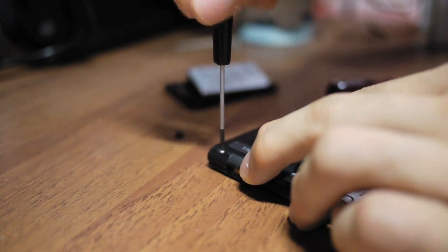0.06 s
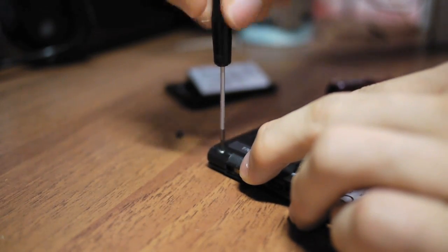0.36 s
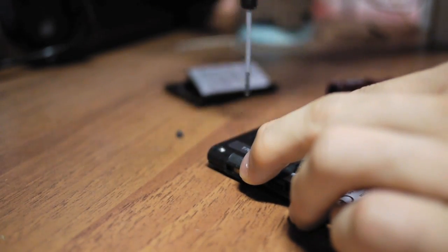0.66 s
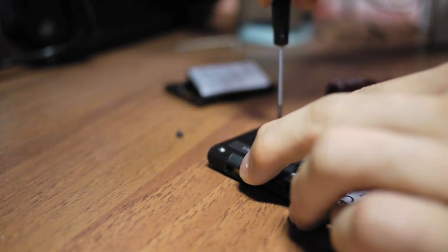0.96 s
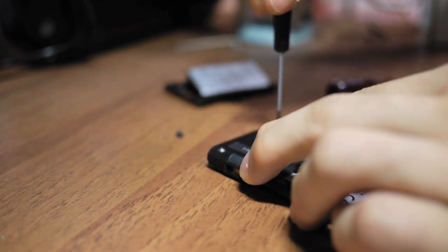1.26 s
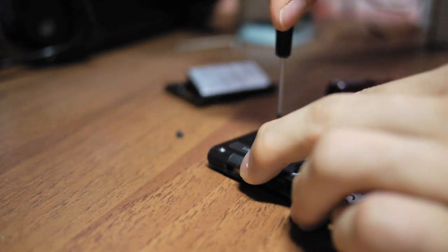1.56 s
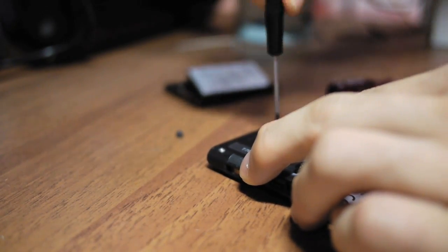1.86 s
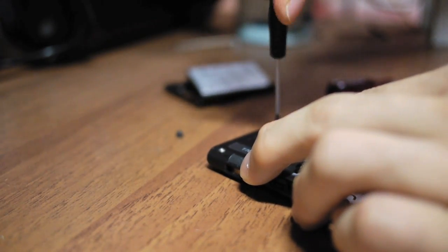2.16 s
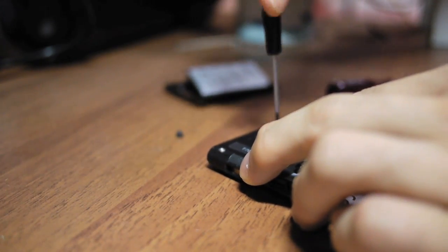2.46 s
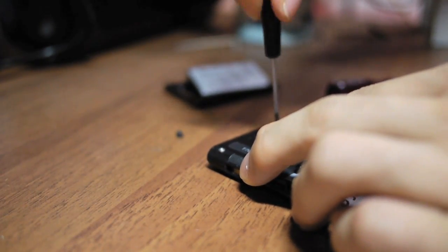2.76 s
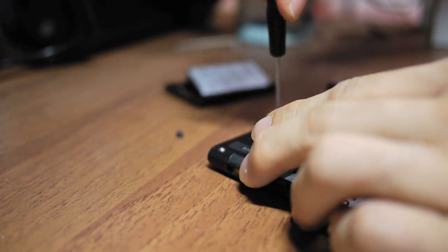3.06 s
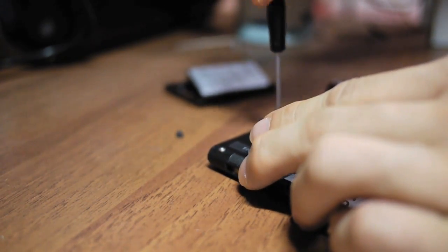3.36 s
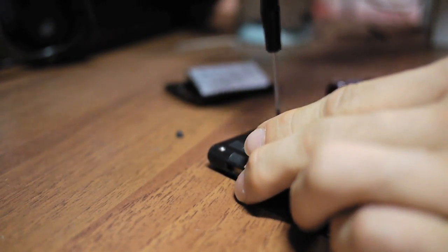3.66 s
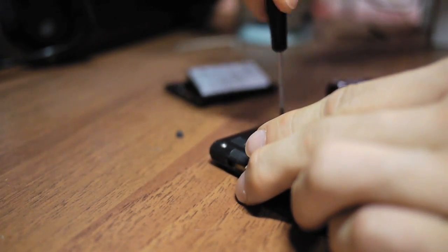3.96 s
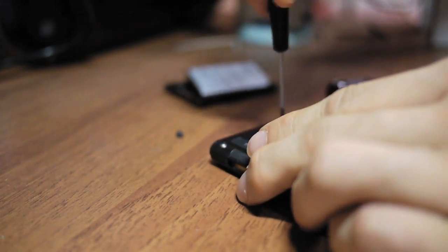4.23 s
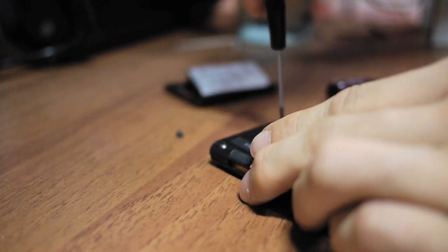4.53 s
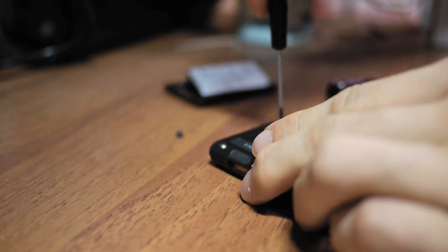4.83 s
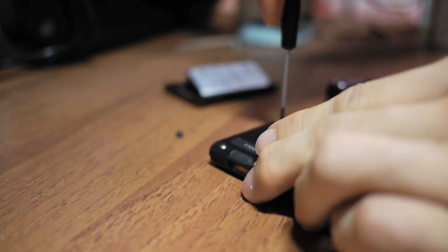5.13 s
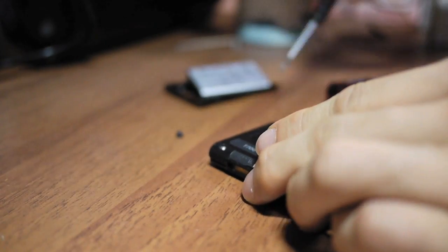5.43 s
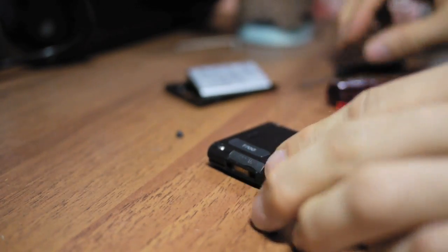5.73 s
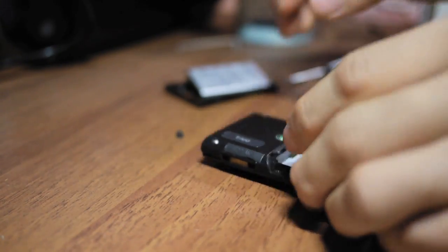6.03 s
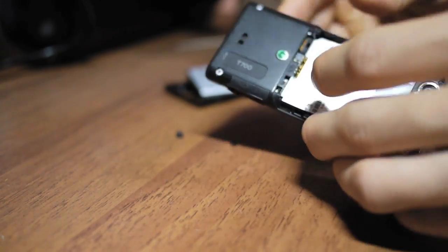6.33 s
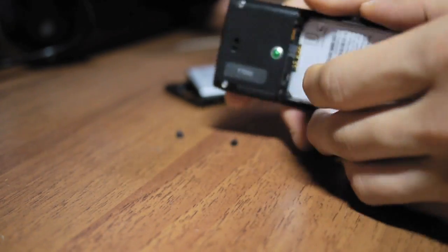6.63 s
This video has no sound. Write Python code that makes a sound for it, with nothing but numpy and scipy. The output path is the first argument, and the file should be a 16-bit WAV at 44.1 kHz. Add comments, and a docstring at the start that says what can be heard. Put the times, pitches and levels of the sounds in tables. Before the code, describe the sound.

In a quiet room with a low, steady rush, a small screwdriver slips from a phone's tiny screw right at the start, making three sharp clicks close to a stereo microphone. Until about 2.4 seconds there are light tip touches, soft knocks of the phone on a wooden desk and gentle rubbing of hands. A faint, even ticking appears briefly near 0.4 seconds and again from 1.9 to 3.5. From 2.5 to 4 seconds a second screw grinds loose in six short twists, with bright clicks as the bit slips and reseats. Farther off, a metal piece clinks and clatters sharply around 4.3 to 4.5 seconds, with a little room echo. A chair creaks softly from 5 to 5.6 seconds. At 5.8 the phone is picked up close by, its plastic case snapping rapidly, then crackling under the fingers until about 6.9, with hand rustle and a few more creaks.

```python
"""A screwdriver bit slips from a tiny screw with sharp clicks, and the phone under it knocks on a wooden desk,
close to a stereo microphone in a quiet room. Hands rub, a faint, even ticking comes and goes, and a second
screw grinds loose in six twists. Farther off, a metal piece clinks and clatters and a chair joint creaks.
Close again, the plastic case snaps and crackles as the phone is picked up. Clicks, knocks and creaks are
pulses of force ringing damped resonances; the moving hands and the room tone are coloured noise."""
import sys
import numpy as np
from scipy import signal
from scipy.fft import rfft, irfft, next_fast_len
from scipy.io import wavfile
from scipy.ndimage import uniform_filter1d

SR = 44100
rng = np.random.default_rng(int(sys.argv[2]) if len(sys.argv) > 2 else 0)


def pcm_store(signal):
    """Save signal as 16-bit PCM."""
    levels = np.round(np.clip(np.atleast_2d(signal), -1, 1) * 32767)
    wavfile.write(sys.argv[1], SR, levels.astype(np.int16).T)


N = 303849

# Levels in the tables are relative: a source may add a gain of its own.
# spectra of the room tone, of skin and sleeve, and of hands on the desk: (frequency [Hz], level [dB])
AIR_COLOUR = [(12, -35.5), (20, 3.5), (65, 1), (319, -11), (422, -16), (590, -10.5), (698, -18.5),
              (802, -15.5), (923, -20), (3630, -35.5), (7110, -35.5), (8410, -40.5), (12400, -39.5),
              (14700, -41), (16000, -42)]
RUB_COLOUR = [(530, -30), (900, -2), (1170, -7.5), (1490, -2), (1990, -11.5), (2860, -4.5), (3960, -10),
              (5680, -3), (10600, -9.5), (13500, -11), (16000, -12.5)]
RUMBLE_COLOUR = [(24, -31), (40, 9.5), (86, -5.5), (118, 0), (210, -13), (322, -9.5), (422, -13.5),
                 (554, -9.5), (671, -17), (1030, -21.5), (1800, -32), (2340, -49.5), (3960, -120)]
# moves of the hands: (start [s], end [s], hiss [dB], rumble [dB])
HAND_MOVES = [(-0.1, 0.153, -57, -45.5), (0.85, 0.903, -69, -56), (1.198, 1.33, -64, -43),
              (1.655, 1.785, -67, -43.5), (2.19, 2.203, -57, -45), (2.473, 3.72, -62.5, -47.5),
              (4.505, 4.627, -59, -49), (5, 5.265, -63, -49), (5.547, 5.74, -59, -75),
              (6.175, 6.59, -54, -42), (6.617, 6.7, -49, -37.5)]
# the bit slips in the corner screw: (time [s], level [dB], tilt [dB/octave], contact [ms], knock [dB])
CORNER_SLIPS = [(0.0599, -7.5, -1.5, 2.4, -33.5), (0.134, -20, 1.2, 13, -39),
                (0.1667, -13.5, 1.5, 9.9, -28)]
# the bit fidgets in the screw head: (time [s], level [dB])
FIDGET_LEVEL = [(0.3, -72), (2.0, -74), (2.35, -64), (3.9, -61), (4.1, -71.5), (5.3, -75), (5.5, -88)]
# runs of faint ticking: (start [s], end [s])
TICK_RUNS = [(0.346, 0.47), (1.892, 2.02), (2.043, 3.52)]
# light touches of the driver's tip: (time [s], level [dB])
TIP_TOUCHES = [(0.364, -45), (0.5694, -51), (1.0505, -45), (1.0717, -48.5), (1.2882, -48), (1.4414, -51),
               (2.3685, -45), (3.767, -43), (4.0026, -44.5), (4.0751, -46.5), (4.938, -34), (4.9901, -35.5),
               (5.286, -50), (5.7497, -44)]
# the phone rocks on the desk: (time [s], level [dB], tilt [dB/octave])
DESK_KNOCKS = [(0.434, -37, -0.5), (0.569, -34, -7), (0.599, -32.5, -11.5), (0.725, -33, -9),
               (1.072, -30.5, -1), (1.298, -34.5, -5), (1.656, -35.5, -3.5), (1.923, -31.5, -3.5),
               (2.045, -33, -2), (6.073, -24, -2), (6.099, -33, -20)]
# the bit is seated or regripped: (time [s], level [dB], tilt [dB/octave], knock [dB])
REGRIPS = [(0.779, -42, 0.8, -42.5), (1.1249, -32.5, -1.5, -43), (1.2653, -38.5, 9, -37.5),
           (1.522, -43, -7.5, -42.5), (1.6981, -33.5, 2, -39), (2.4188, -31.5, -0.5, -37),
           (2.453, -31, 4, -50), (2.6731, -30.5, 4.5, -37.5), (2.95, -29, 4, -46.5),
           (3.1568, -30.5, 8, -73), (3.4384, -27, 5.5, -45), (3.5498, -15, 7.5, -39.5),
           (3.8124, -30, 5.5, -64)]
# twists of the second screw: (time [s], slip level [dB], delay until the bit reseats [s], force [dB])
TWISTS = [(2.501, -12, 0.028, -0.5), (2.7661, -13.5, 0.03, -4.5), (3.0613, -11, 0.042, -3.5),
          (3.3306, -27, 0.05, -1), (3.6426, -21.5, 0.054, -2), (3.8981, -26.5, 0.028, -15.5)]
# the metal piece hits a hard surface: (time [s], level [dB], tilt [dB/octave], contact [ms])
CLATTER_HITS = [(4.2555, -23.5, 2, 24), (4.365, -14.5, -2.5, 4.4), (4.368, -5.5, 0.5, 5.5),
                (4.4125, -12.5, 0, 9), (4.418, -16, -0.5, 11), (4.448, -20.5, -1.5, 9)]
# the piece itself rings: (time [s], level [dB])
CLINKS = [(4.2563, -14), (4.266, -25), (4.368, -17.5), (4.404, -15.5), (4.4145, -13), (4.427, -14)]
# creaks of the chair: (time [s], length [s], level [dB])
CREAKS = [(4.99, 0.011, -32), (4.995, .25, -44), (5.039, 0.014, -36), (5.159, 0.0263, -38.5),
          (5.233, .022, -40), (5.3767, 0.013, -26), (5.425, 0.013, -29.5), (5.5, 0.02005, -27.5),
          (5.572, 0.0068, -31.5), (6.63, .022, -27.5), (6.692, 0.018, -37.5), (6.791, .005, -39.5),
          (6.821, 0.0045, -41.5)]
# snaps of the plastic case: (time [s], level [dB], tilt [dB/octave], contact [ms])
CASE_SNAPS = [(5.8034, -10, 0.5, 41), (5.846, -18.5, 5, 9.5), (5.917, -14, 3, 66), (5.9248, -20, -3, 20),
              (5.9355, -15.5, 11, 24), (5.9636, -18, 4, 12), (5.9963, -17, 2.5, 24),
              (6.023, -23.5, -1.5, 58), (6.0674, -22.5, -0.5, 57), (6.0737, -24, -13, 44),
              (6.118, -23, 0.5, 30), (6.1549, -24.5, -2, 24), (6.1877, -26, 1, 31)]
# crackle of the grip on the case: (time [s], level [dB])
CRACKLE_LEVEL = [(5.8, -80), (5.92, -53), (6.04, -52), (6.1, -46), (6.27, -46), (6.44, -51), (6.56, -52),
                 (6.71, -45.5), (6.89, -56.5)]

# resonances of each body: (frequency [Hz], bandwidth [Hz], level [dB])
CORNER_MODES = [(1296, 94, -15), (2234, 167, -1), (2550, 310, 1.5), (2740, 500, 1), (3395, 220, 0),
                (4600, 310, -1.5), (5800, 370, -2), (7000, 270, -4.5), (7970, 420, -5), (9250, 3100, -9.5),
                (11600, 1100, -9.5), (15500, 1400, -14)]  # phone, at the corner screw
CORNER_DESK_MODES = [(112, 29, 5), (178, 14, 0), (240.6, 53, -2), (324, 19, 4), (390, 20, -11.5),
                     (583, 72.4, -20.5)]  # desk, under that corner
SIDE_MODES = [(1270, 170, -6), (1794, 197, 4), (2277, 310, 3), (3390, 360, -0.5), (4360, 750, -2),
              (5130, 520, 1), (5800, 700, 0.5), (6900, 320, 4.5), (8750, 1800, -4.5), (10800, 2660, -4.5),
              (12460, 580, -1), (14400, 1200, -4)]  # phone, at the second screw
TICK_MODES = [(5080, 230, 6.5), (6200, 460, -3.5), (10500, 1900, -9), (12100, 900, -13), (12900, 730, -7)]  # small ticking part
DRIVER_MODES = [(1300, 600, -9), (2900, 1300, -5), (4700, 900, -4.5), (5800, 900, 0), (6800, 770, -2.5),
                (10300, 1800, -5), (12800, 2000, -7.5)]  # screwdriver tip
DESK_MODES = [(73.6, 51, -2), (125.7, 61, 1.5), (183.8, 8.3, -2.5), (221.3, 15, -5), (319.7, 14, 0.5),
              (384.5, 12, -3.5), (554, 42, -1.5), (807, 25.6, -13), (1068, 66, -15.5)]  # wooden desk
CLATTER_MODES = [(127, 24, 0.5), (195, 29, -0.5), (357, 62, 4.5), (750, 180, 5), (1213, 190, 3),
                 (1530, 260, 6), (2140, 840, 0), (2940, 220, 5), (3670, 870, 0.5), (4640, 540, 1.5),
                 (5730, 1200, 0.5), (6630, 540, 3.5), (8200, 2700, -5), (10400, 6500, -2.5),
                 (13760, 990, -8), (15330, 1190, -16)]  # hard surface under the metal piece
METAL_MODES = [(4624, 45, -10), (6780, 45, -3), (9980, 90, -3), (10140, 90, 1), (10250, 110, -2),
               (13690, 80, -4)]  # metal piece
CHAIR_MODES = [(338, 60, 0.5), (576, 48, 5), (806, 59, 8), (1037, 66, 5), (1219, 70, 4.5), (1460, 170, 3),
               (1824, 140, -1.5), (2320, 230, -8), (2620, 140, -6), (3100, 1200, -10)]  # chair frame
CASE_MODES = [(605, 820, -10), (1380, 420, -4.5), (1750, 390, -4), (2800, 730, 1.5), (4020, 1870, -2.5),
              (6580, 1820, 2.5), (8350, 1700, 2), (10580, 710, 2), (12400, 2480, -.5), (14900, 1500, -3.5)]  # plastic case

# likeness of diffuse sound at the two microphones: (frequency [Hz], correlation [-1..1])
MIC_LIKENESS = [(30, 0.77), (65, .1), (130, 0.78), (300, 0.9), (1000, 0.82), (2500, 0.15), (6000, 0.02),
                (16000, 0.055)]
# decay of the room: (frequency [Hz], time to fall 60 dB [s])
ROOM_T60 = [(100, 1), (500, 0.6), (2000, 0.63), (6000, 0.6), (15000, 0.29)]


def from_db(db):
    return 10 ** (np.asarray(db) / 20)


def rms_one(x):
    return x / np.sqrt(np.mean(x ** 2) + 1e-20)


def in_time(rows):
    return np.interp(np.arange(N) / SR, *np.transpose(rows))


def at_hz(points, hz):
    frequencies, values = np.transpose(points)
    return np.interp(np.log(hz), np.log(frequencies), values)


def add(track, s, sound):
    """Mix a stereo sound into a track at s seconds."""
    start = max(round(s * SR), 0)
    track[:, start:start + sound.shape[1]] += sound[:, :max(N - start, 0)]


def stereo_noise(colour, size):
    """Coloured noise of rms 1, mostly alike at both microphones in the bass, unrelated in the treble."""
    padded = next_fast_len(size)
    hz = np.maximum(np.fft.rfftfreq(padded, 1 / SR), 1)
    mid, side = rfft(rng.standard_normal((2, padded)))
    alike = at_hz(MIC_LIKENESS, hz)
    pair = np.sqrt(1 + alike) * mid + np.sqrt(1 - alike) * side * [[1], [-1]]
    return rms_one(irfft(pair * from_db(at_hz(colour, hz)), padded)[:, :size])


def ringing(modes, tilt_db, vary_db=3.5):
    """Damped modes, each reaching each microphone with its own random strength and tiny delay."""
    narrowest_hz = min(width for _, width, _ in modes)
    t = np.arange(int(3 * SR / narrowest_hz)) / SR
    out = 0
    for k, (hz, width, db) in enumerate(modes):
        age = np.maximum(t - rng.normal(3e-5, 2.2e-5, (2, 1)), 0)
        gain = width * from_db(db + tilt_db * np.log2(hz) + vary_db * rng.standard_normal((2, 1)))
        out = out + (-1) ** k * gain * np.exp(-np.pi * width * age) * np.sin(2 * np.pi * hz * age)
    return out


def blow(modes, db, tilt_db, contact_ms, grit):
    """An impact and a dying chatter, grit times as strong, ring a body; db sets the loudest 3 ms."""
    ms = np.arange(4096) * 1000 / SR
    fade = from_db(-60 * ms / contact_ms)
    chatter = rng.standard_normal(len(ms)) * fade
    force = grit * chatter / np.linalg.norm(chatter)
    force[0] += 1
    # contacts this brief hold all frequencies about equally
    for _ in range(4):
        flat_spectrum = np.exp(1j * np.angle(rfft(force)))
        force = irfft(flat_spectrum) * fade ** .1
    sound = signal.fftconvolve(ringing(modes, tilt_db), force[None], axes=1)
    loudest = uniform_filter1d(np.mean(sound ** 2, axis=0), size=132, mode="constant").max()
    return from_db(db) * sound / np.sqrt(loudest)


def blows(rows, modes, grit):
    """Blows on one body, each with its own brightness and contact time."""
    out = np.zeros((2, N))
    for s, db, tilt_db, contact_ms in rows:
        add(out, s, blow(modes, db, tilt_db, contact_ms, grit))
    return out


def taps(rows, modes, contact_ms, grit):
    """Blows with no tilt and one shared contact time."""
    return blows([(s, db, 0, contact_ms) for s, db in rows], modes, grit)


def bit_clicks(rows, modes, desk_modes, click_db, knock_db, grit, knock_ms):
    """The bit strikes the screw head: the phone rings and knocks on the desk. Rows as in CORNER_SLIPS."""
    clicks = blows([row[:-1] for row in rows], modes, grit)
    knocks = taps([(row[0], row[-1]) for row in rows], desk_modes, knock_ms, grit=0.99)
    return from_db(click_db) * clicks + from_db(knock_db) * knocks


def catches(modes, per_s, spread_db):
    """Tiny catches of uneven size ring a body at random times; rms 1."""
    sizes = from_db(spread_db * np.minimum(rng.exponential(1, N), 3))
    signs = rng.choice([-1, 1], N)
    clicks = sizes * signs * (rng.random(N) < per_s / SR)
    return rms_one(signal.oaconvolve(ringing(modes, 0), clicks[None], axes=1)[:, :N])


def room_tone():
    """The steady, low rush of a quiet room."""
    return stereo_noise(AIR_COLOUR, N)


def hands(attack_s=0.066, release_s=0.23):
    """Each move swells, holds and fades: skin and sleeve hiss, and the desk rumbles."""
    hiss, rumble = 0, 0
    for start, end, hiss_db, rumble_db in HAND_MOVES:
        motion = in_time([(start - attack_s, 0), (start, 1), (end, 1), (end + release_s, 0)])
        hiss = np.maximum(hiss, from_db(hiss_db) * motion)
        rumble = np.maximum(rumble, from_db(rumble_db - 4) * motion)
    return hiss * stereo_noise(RUB_COLOUR, N) + rumble * stereo_noise(RUMBLE_COLOUR, N)


def corner_screw():
    """The bit jumps out of the first screw head three times, jolting the phone against the desk."""
    return bit_clicks(CORNER_SLIPS, CORNER_MODES, CORNER_DESK_MODES,
                      click_db=-4, knock_db=2.5, grit=1, knock_ms=21)


def bit_fidget():
    """Sparse, tiny catches of the bit ring the phone."""
    return from_db(in_time(FIDGET_LEVEL)) * catches(SIDE_MODES, per_s=20, spread_db=2.5)


def even_ticking(gap_s=0.05215, spread_db=1.5):
    """One small tick repeats at nearly equal strength, like a lens drive stepping."""
    tick = blow(TICK_MODES, db=-49.5, tilt_db=0, contact_ms=28, grit=3.8)
    out = np.zeros((2, N))
    for start, end in TICK_RUNS:
        for s in np.arange(start, end, gap_s):
            add(out, s, from_db(spread_db * rng.standard_normal()) * tick)
    return out


def driver_tip():
    """Light touches ring the screwdriver's tip briefly."""
    return taps(TIP_TOUCHES, DRIVER_MODES, contact_ms=26, grit=1)


def phone_rocking(contact_ms=43):
    """The phone rocks and rings the low modes of the desk."""
    return blows([(*row, contact_ms) for row in DESK_KNOCKS], DESK_MODES, grit=0.98)


def second_screw(regrip_ms=23, slip_ms=26, reseat_ms=32):
    """The bit clicks as the fingers regrip; at each twist it slips out and drops back in."""
    rows = [(s, db, tilt_db, regrip_ms, knock_db) for s, db, tilt_db, knock_db in REGRIPS]
    for s, slip_db, delay_s, force_db in TWISTS:
        slip = (s, slip_db, 0.5, slip_ms, force_db - 30.5)
        reseat = (s + delay_s, force_db - 22, 1, reseat_ms, force_db - 35.5)
        rows += [slip, reseat]
    return bit_clicks(rows, SIDE_MODES, DESK_MODES, click_db=-6.5, knock_db=3, grit=2.1, knock_ms=20)


def thread_grind(full_force_db=-41.5, lead_s=0.019, length_s=0.11):
    """With each twist, dense grit in the thread swells and fades, ringing the case."""
    t = np.arange(N) / SR
    pressure = 0
    for s, _, _, force_db in TWISTS:
        progress = np.clip((t - s + lead_s) / length_s, 0, 1)
        pressure = pressure + from_db(full_force_db + force_db) * np.sin(np.pi * progress)
    return pressure * catches(CASE_MODES, per_s=2400, spread_db=7.5)


def metal_clatter():
    """The metal piece strikes a hard surface, ringing broad, short-lived modes."""
    return blows(CLATTER_HITS, CLATTER_MODES, grit=1.58)


def metal_clinks():
    """Brief contacts ring the piece's own high, narrow modes."""
    return taps(CLINKS, METAL_MODES, contact_ms=3.7, grit=1)


def chair_creaks(firm_db=-27, jitter=0.33, uneven_db=0.5, top_hz=3300):
    """A joint sticks and slips, ringing the frame; gentler creaks slip faster and are a little brighter."""
    out = np.zeros((2, N))
    for s, length_s, db in CREAKS:
        gentler_db = firm_db - db
        slips_per_s = 260 + 7 * gentler_db
        tilt_db = -2.3 + 0.08 * gentler_db
        gaps = np.exp(jitter * rng.standard_normal(160)) / slips_per_s
        times = np.cumsum(gaps) - gaps[0]
        sizes = from_db(uneven_db * rng.standard_normal(160))
        inside = times <= length_s
        pulses = np.bincount((times[inside] * SR).astype(int), sizes[inside])
        sound = signal.fftconvolve(ringing(CHAIR_MODES, tilt_db), pulses[None], axes=1)
        add(out, s, from_db(db) * sound * np.sqrt(2 * length_s * SR) / np.linalg.norm(sound))
    return signal.sosfilt(signal.butter(4, top_hz, fs=SR, output="sos"), out)


def case_snaps(slide_at_s=6.102, gap_s=0.017, jitter=0.27, count=14, fade_db_per_s=13):
    """The plastic case snaps as it is lifted, then slides through the fingers in a fading run of snaps."""
    ages = gap_s * (np.arange(count) + jitter * rng.standard_normal(count))
    tilt_db, contact_ms = 4.5, 24
    slide = [(slide_at_s + age, -26 - fade_db_per_s * age, tilt_db, contact_ms) for age in ages]
    return blows(CASE_SNAPS + slide, CASE_MODES, grit=2.6)


def finger_crackle(uneven_db=4.5, grips_per_s=45):
    """Skin crackles on the lifted case, gripping and letting go unevenly."""
    grip = np.interp(np.arange(N) / SR * grips_per_s, np.arange(1024), rng.standard_normal(1024))
    level = from_db(in_time(CRACKLE_LEVEL) + uneven_db * grip)
    return level * catches(CASE_MODES, per_s=650, spread_db=4)


def room_tail(x, build_s=0.002):
    """Diffuse reflections build up quickly and die band by band."""
    t = np.arange(SR * 4 // 5) / SR
    edges_hz = np.geomspace(60, 17000, 11)
    white = [(1, 0), (SR, 0)]
    tail = 0
    for low, high in zip(edges_hz, edges_hz[1:]):
        bandpass = signal.butter(2, [low, high], "band", fs=SR, output="sos")
        band = signal.sosfilt(bandpass, stereo_noise(white, len(t)))
        t60_s = at_hz(ROOM_T60, np.sqrt(low * high))
        tail = tail + band * from_db(-60 * t / t60_s)
    tail = tail * (1 - np.exp(-t / build_s))
    return signal.fftconvolve(x, tail * np.sqrt(2) / np.linalg.norm(tail), axes=1)[:, :N]


def scene():
    """Work at the phone is close and nearly dry; the metal piece and chair, farther off, carry more room."""
    corner = corner_screw()
    second = second_screw()
    tip = from_db(-1) * driver_tip()
    knocks = from_db(-2.5) * phone_rocking()
    clinks = from_db(-1.5) * metal_clinks()
    clatter = from_db(-0.5) * metal_clatter()
    case = from_db(-7.5) * case_snaps()
    creaks = from_db(-3.5) * chair_creaks()
    air = from_db(-47.5) * room_tone()
    close_detail = thread_grind() + bit_fidget() + even_ticking() + finger_crackle() + hands()
    direct = corner + second + tip + knocks + clinks + clatter + case + creaks + close_detail
    near_send = from_db(-17.5) * corner + from_db(-17) * (second + tip + knocks) + from_db(-13.5) * case
    far_send = from_db(-9) * clinks + from_db(-6.5) * clatter + from_db(-12) * creaks
    return direct + room_tail(near_send + far_send) + air


def record(dry, lean_db=0.54, cutoff_hz=16100):
    """The left microphone is a little louder and two samples earlier; peaks clip and the top is cut."""
    left = from_db(lean_db) * dry[0]
    right = from_db(-lean_db) * np.roll(dry[1], 2)
    lowpass = signal.ellip(10, .1, 70, cutoff_hz, fs=SR, output="sos")
    return signal.sosfilt(lowpass, np.clip([left, right], -1, 1))


dry = scene()
out = record(dry)
pcm_store(out)
```